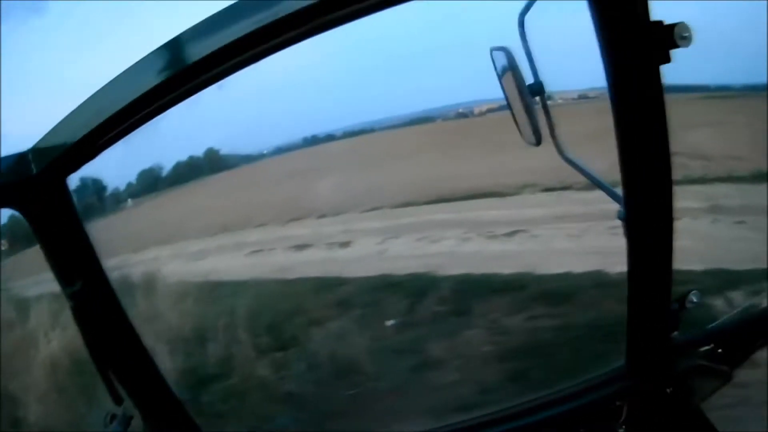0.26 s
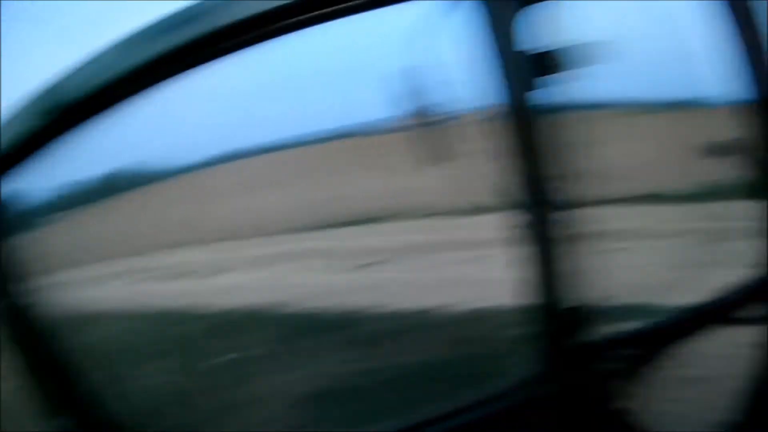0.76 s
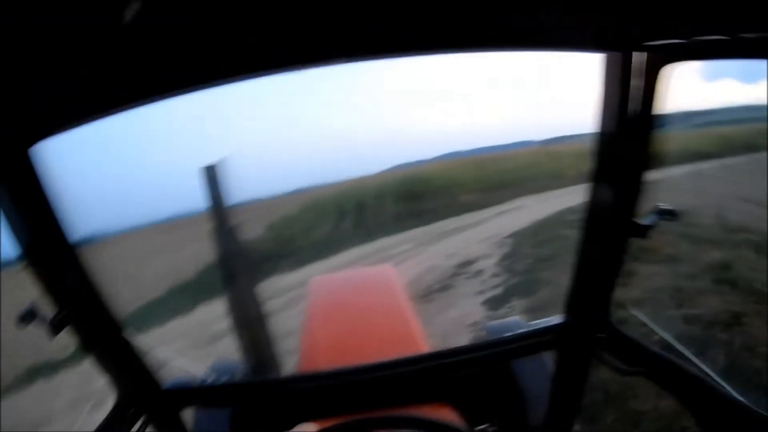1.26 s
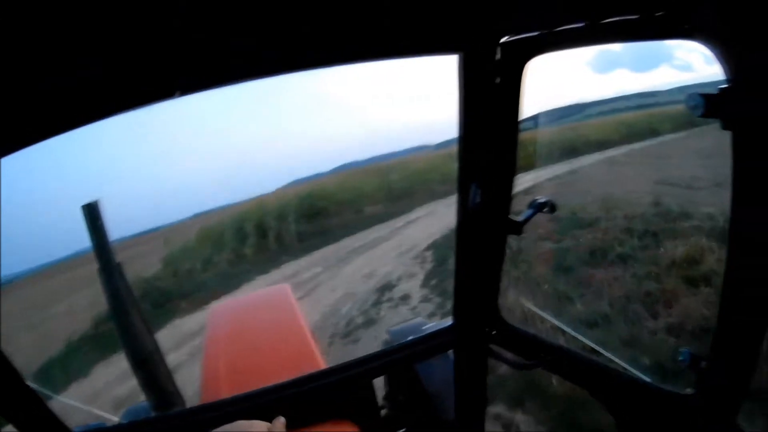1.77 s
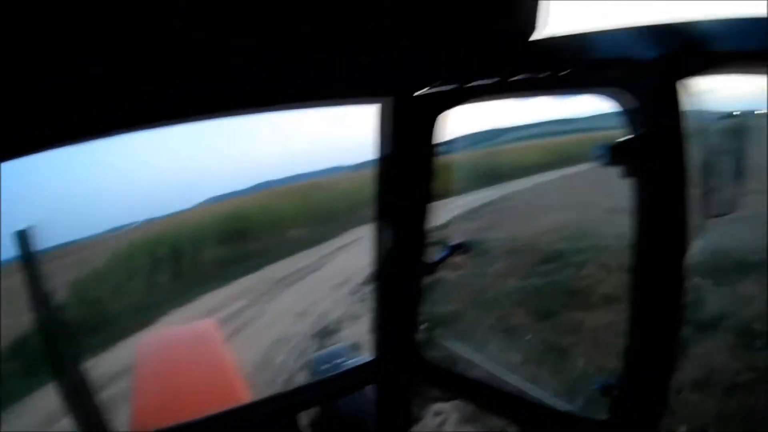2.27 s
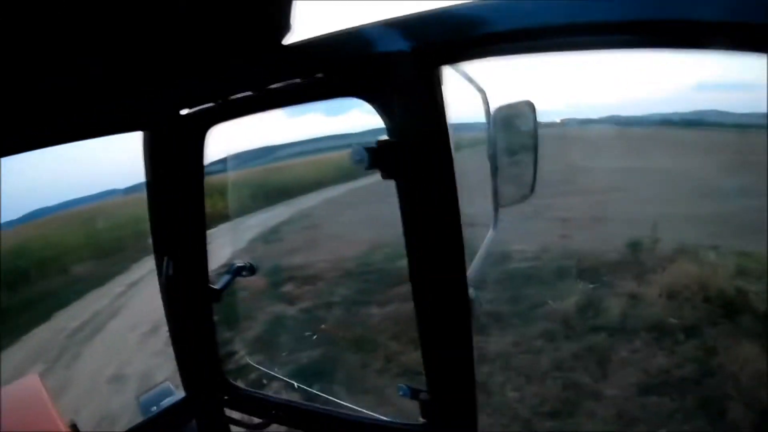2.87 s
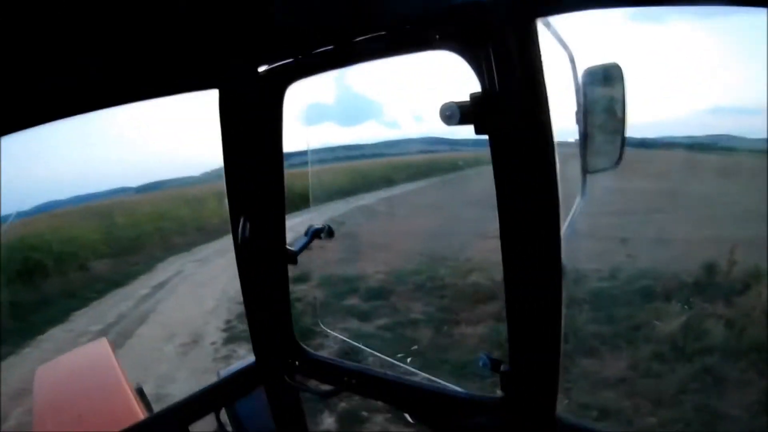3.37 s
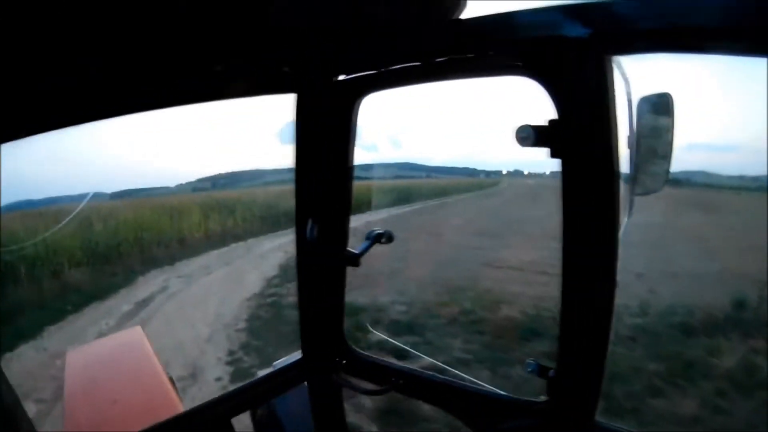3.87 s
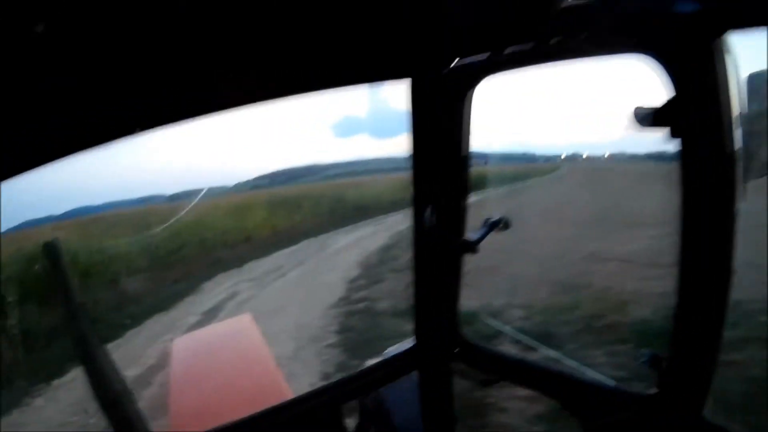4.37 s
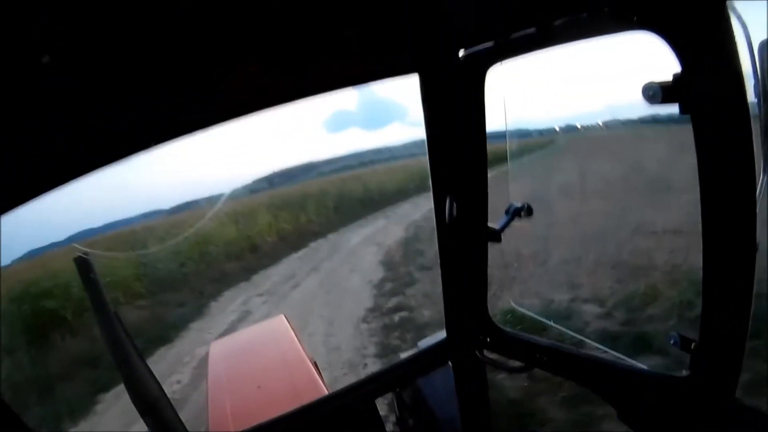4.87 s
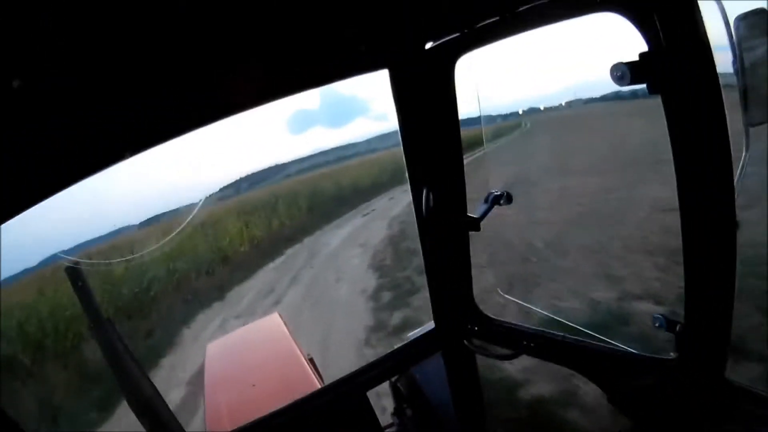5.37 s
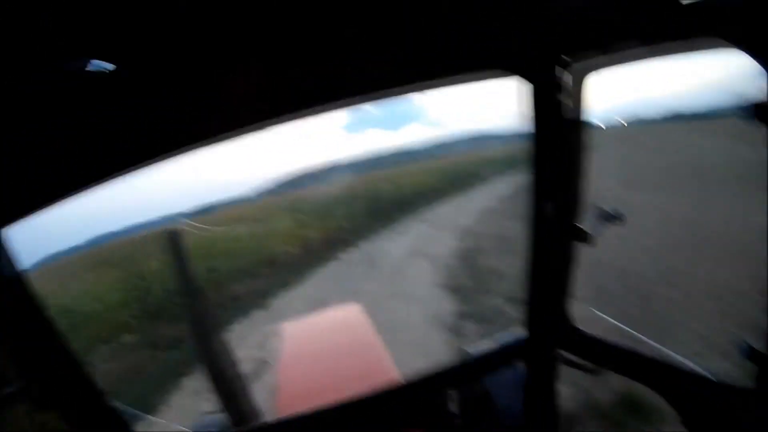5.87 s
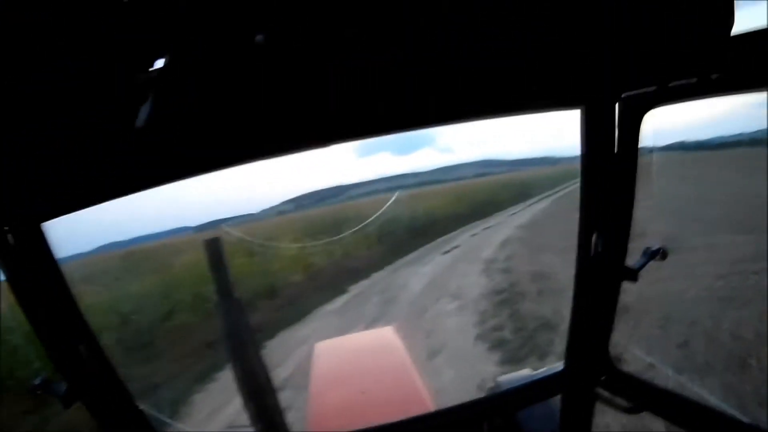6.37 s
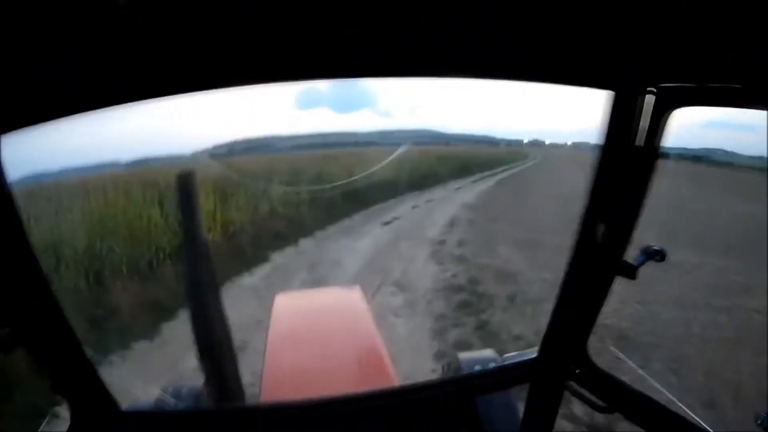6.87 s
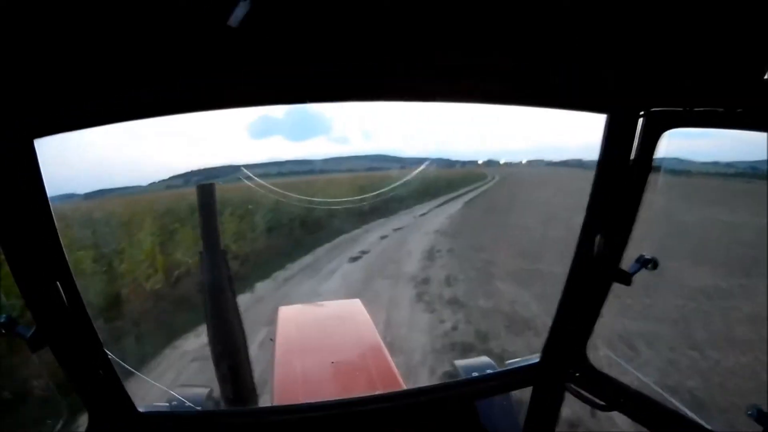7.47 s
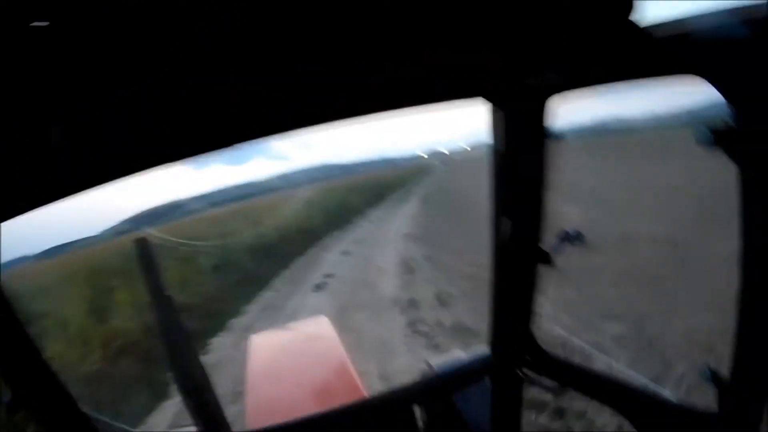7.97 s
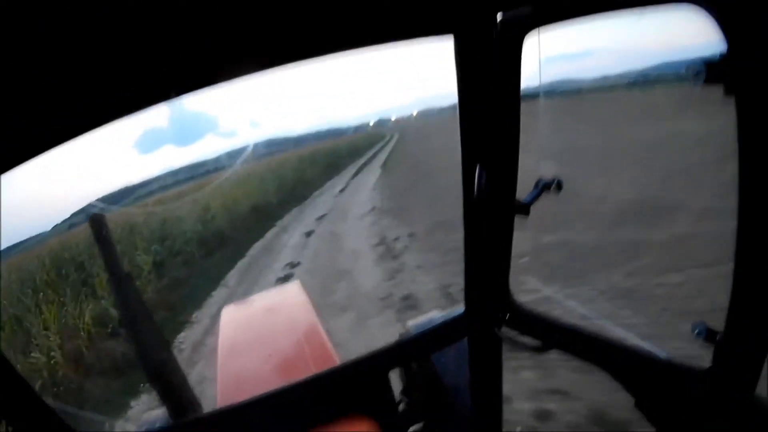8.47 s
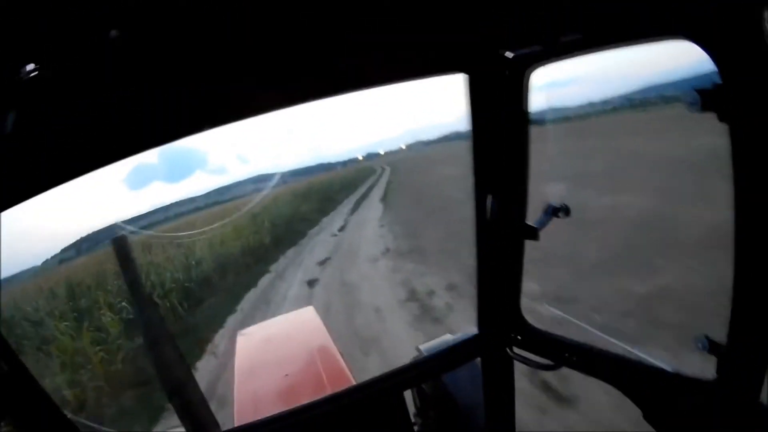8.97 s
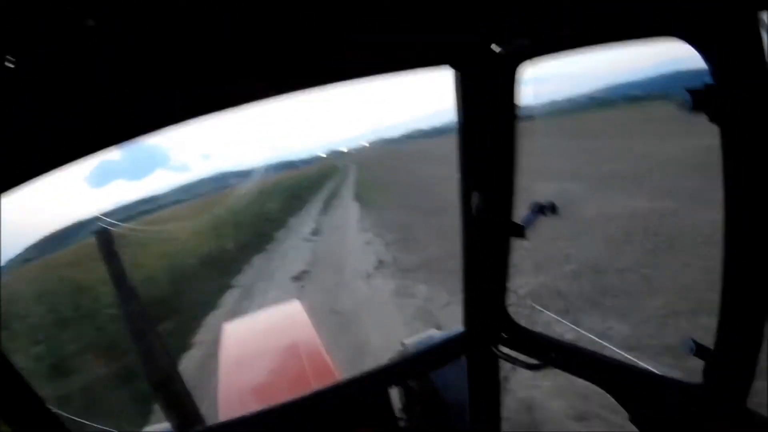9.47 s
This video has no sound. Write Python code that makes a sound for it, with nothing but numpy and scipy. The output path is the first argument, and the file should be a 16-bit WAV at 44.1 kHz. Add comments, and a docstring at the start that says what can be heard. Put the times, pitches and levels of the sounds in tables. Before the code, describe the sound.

A rough diesel tractor engine runs continuously, heard from the driver's place in an enclosed, resonant cab. Hard metallic knocks and bright valve ticking sit over droning exhaust tones and pulsing panel rumble. The note sags slightly, recovers, rises strongly past the middle, eases sharply off load with a few jolts, then labours low and rises to the end. A camera's own mono microphone leaves steady hiss, very high whine and tiny chirps.

```python
"""On a dirt track, inside the cab of a three-cylinder diesel tractor, on a camera's own microphone.
Knocks and valve taps ring the block close by, exhaust overtones glide through the cab's standing waves.
The engine speeds up, the throttle is shut for a second, then it pulls again.
Cab walls boom and rumble, sheet metal buzzes under load, and bumps in the track jolt loose parts.
Behind it all the camera's electronics add steady high tones, hiss and quick faint chirps."""
import sys
import numpy as np
from scipy import signal
from scipy.fft import rfft, irfft, next_fast_len
from scipy.io import wavfile
from scipy.ndimage import uniform_filter1d, minimum_filter1d

SR = 44100
rng = np.random.default_rng(int(sys.argv[2]) if len(sys.argv) > 2 else 0)


def master_out(mix):
    """Clip the mix to full scale and print it as 16-bit PCM to the path in sys.argv[1]."""
    frames = np.transpose(np.atleast_2d(mix))
    ceiling = np.clip(frames, -1, 1)
    pcm = np.round(ceiling * 32767).astype(np.int16)
    wavfile.write(sys.argv[1], SR, pcm)


N = 429529
T = np.arange(N) / SR
CYLINDERS = 3


def amp(db):
    """Decibels to gain."""
    return 10 ** (np.asarray(db) / 20)


def evened(x):
    """Scales to rms 1."""
    return x / np.sqrt(np.mean(x ** 2) + 1e-20)


def curves(rows):
    """Each column of a table, joined by straight lines in time."""
    s, *columns = np.transpose(rows)
    return [np.interp(T, s, column) for column in columns]


def humps(x, rows):
    """Lift in dB near each (centre, width, dB), shaped like a resonance."""
    return sum(db / (1 + (2 * (x - centre) / width) ** 2) for centre, width, db in rows)


def waver(hz):
    """Random drift of rms 1 with nothing faster than the given rate."""
    size = next_fast_len(N, True)
    spectrum = rfft(rng.standard_normal(size))
    slow = np.fft.rfftfreq(size, 1 / SR) < hz
    return evened(irfft(spectrum * slow, size)[:N])


def colour(x, points, rings=(), size=8192):
    """Causal minimum-phase filter with the given spectrum and resonances; the result has rms 1."""
    hz = np.fft.rfftfreq(size, 1 / SR)
    f, db = np.transpose(points)
    db = np.interp(np.log(hz + 1), np.log(f), db) + humps(hz, rings)
    log_gain = np.log(amp(np.r_[db, db[-2:0:-1]]))
    response = np.fft.ifft(np.exp(np.conj(signal.hilbert(log_gain)))).real[:size // 2]
    return evened(signal.oaconvolve(x, response)[:N])


def blows(cycle, place, spread_db, jitter_s):
    """One click each time the engine cycle passes a place, uneven in strength and timing."""
    at = np.flatnonzero(np.diff(np.floor(cycle - place)) > 0)
    size, slip = rng.standard_normal((128, 2))[:len(at)].T
    at = at + np.round(slip * jitter_s * SR).astype(int)
    clicks = np.zeros(N)
    clicks[np.clip(at, 0, N - 1)] = amp(spread_db * size)
    return clicks


def dying(clicks, decay_s):
    """Each click becomes an exponential decay."""
    return signal.lfilter([1], [1, -np.exp(-1 / (decay_s * SR))], clicks)


def chatter(cycle, alike, size=4096):
    """Tiny metal contacts: a share of the power recurs at the same crank angle, the rest is new."""
    alike = np.clip(alike, 0, 1)
    recurring = rng.standard_normal(size)[(cycle % 1 * size).astype(int)]
    return np.sqrt(alike) * recurring + np.sqrt(1 - alike) * rng.standard_normal(N)


def order(cycle, multiple):
    """One sinusoidal partial of the engine's pressure wave, locked to the crankshaft."""
    return -np.cos(2 * np.pi * multiple * cycle - np.pi / 4)


# engine speed: time_s, firings_per_s
ENGINE_SPEED = [(0.0, 29.59), (0.37, 28.593), (1.36, 27.229), (2.3, 30.559), (2.9, 29.892), (3.2, 30.211),
                (4.14, 29.626), (4.36, 31.272), (4.65, 31.435), (4.94, 33.663), (5.35, 35.405),
                (6.17, 41.961), (6.46, 42.564), (7.48, 30.733), (7.55, 31.231), (7.88, 27.283),
                (8.33, 29.384), (9.74, 34.923)]
# load as the engine pulls, eases and coasts: time_s, load_db (relative to full load)
ENGINE_LOAD = [(0, -5), (1.23, -3.5), (1.7, -1), (2.27, -1), (2.36, -4), (3.55, -6.5), (4.15, -5.5),
               (4.3, -2.5), (5.9, -1), (6.4, -3), (6.5, -17.5), (7.33, -14.5), (7.41, -1), (7.58, -1.5),
               (7.9, -1.9), (8.4, -1), (9.74, -2)]
CRUISE_HZ = 30  # firings per second at which the loudness laws start


def level(law):
    """Level in dB from engine speed and load; every law lists level_db, db_per_octave, db_per_load_db."""
    db, db_per_octave, db_per_load = law
    octaves = np.log2(curves(ENGINE_SPEED)[0] / CRUISE_HZ)
    return db + db_per_octave * octaves + db_per_load * curves(ENGINE_LOAD)[0]


SWING_S, SWING_LENGTH_S = 0.82, 1  # middle and length of the camera's turn


def sideways():
    """1 while the camera faces the side window, nearer the clatter; 0 once it faces the front."""
    return np.clip(.5 - (T - SWING_S) / SWING_LENGTH_S, 0, 1)


# cylinder blows, each hard within a range of speed; the second cylinder strikes twice:
# cycle_place (0-1), ring_hz, relative_db, range_middle (firings per s), range_width (firings per s)
KNOCKS = [(.011, 1410, -10.5, 30, 9.6), (.312, 1420, -4.5, 28.6, 2.4), (.378, 1460, -1.5, 28.8, 2.6),
          (.652, 1587, 2, 32.1, 5.5)]
# the soft blow present at all speeds, which grows as the engine races
SOFT_KNOCK_LAW = (-15, 22, 0)
HALF_FORCE_LOAD_DB = -17  # load at which the knocks have half their force


def knocks(cycle, firing_hz):
    """Combustion strikes the block, less at low load; each blow swells and rings for milliseconds."""
    t, out = T[:1024], 0
    swell = t / .0019 * np.exp(1 - t / .0019)
    fuel = np.clip(1.5 - (curves(ENGINE_LOAD)[0] / HALF_FORCE_LOAD_DB) ** 2, 0, 1)
    soft = amp(level(SOFT_KNOCK_LAW))
    for place, hz, db, middle_hz, width in KNOCKS:
        in_range = 1 / (1 + (2 * (firing_hz - middle_hz) / width) ** 4)
        force = fuel * (soft + amp(db) * in_range)
        strikes = 2 * force * blows(cycle, place, spread_db=1, jitter_s=.00008)
        ring = swell * np.sin(2 * np.pi * hz * t)
        out = out + signal.oaconvolve(strikes, ring)[:N]
    return out


# spectrum of the engine block: pitch_hz, relative_db
BLOCK = [(200, -31), (500, -18), (800, -10.5), (1040, -2.5), (1180, -3), (1330, -1), (1500, 2),
         (1680, -2.5), (1850, -5.5), (2020, -6.5), (2300, -19.5), (2750, -25.5), (3700, -49), (6000, -56.5)]
# rings of the block and the tin around it, also heard in the valves: pitch_hz, width_hz, lift_db
RINGS = [(1320, 41, 6.5), (1483, 36, 6), (1690, 96, 3.5), (2473, 26, 6), (3150, 96, 6), (3286, 26, 5),
         (3440, 56, 8.5)]


def block(cycle, slaps, taps):
    """Blows and taps ring the cast block over a bed of gear chatter."""
    power = dying(.5 * slaps + taps ** 2, decay_s=.0035) + .38
    return colour(np.sqrt(power) * chatter(cycle, alike=.7), BLOCK, RINGS)


# spectrum of the valve gear: pitch_hz, relative_db
VALVES = [(1500, -10.5), (2500, 2), (2950, -2.5), (3330, 1.5), (3500, -1.5), (3700, -4.5), (3850, -6.5),
          (3980, 5), (4400, 2.5), (4800, -5), (5300, -13), (6800, -16), (8000, -33), (14000, -55)]


def valves(cycle, slaps, taps):
    """The same blows shake the light valve gear into a brighter, less regular chatter."""
    power = dying(slaps + taps, decay_s=.004) + .7
    return colour(np.sqrt(power) * chatter(cycle, alike=.3), VALVES, RINGS)


# lighter blows of injectors and valves: cycle_place (0-1), relative_db
TAPS = [(0.11, -8), (0.31, 2), (0.423, -6.5), (.468, -7), (0.634, 0), (0.751, -4), (.975, -3)]
# loudness of the block with its knocks, then of the valves
CLATTER_LAW = (-21, 11.4, 0.62)
VALVE_LAW = (-46, 12.8, 0.41)
# spells in which the treble of the clatter swells: middle_s, length_s, lift_db
BRIGHT_SPELLS = [(1.9, .7, 2), (3.5, 0.33, 2.5), (8.05, 0.99, 4.5)]
SIDE_CLATTER_DB = 2.6  # extra clatter toward the side window; the valves get half of these dB


def clatter(cycle, firing_hz):
    """Each engine cycle triggers blows and taps that excite the block and the valve gear."""
    slaps = sum(blows(cycle, place, spread_db=.8, jitter_s=.0004) for place, *_ in KNOCKS)
    taps = sum(amp(db) * blows(cycle, place, spread_db=1, jitter_s=.0004) for place, db in TAPS)
    side_db = SIDE_CLATTER_DB * sideways()
    block_gain = amp(level(CLATTER_LAW) + side_db)
    valve_gain = amp(level(VALVE_LAW) + humps(T, BRIGHT_SPELLS) + .5 * side_db)
    low = knocks(cycle, firing_hz) + block(cycle, slaps, taps)
    return block_gain * low + valve_gain * valves(cycle, slaps, taps)


# overtones; unequal cylinders fill in between the firing orders: cycle_multiple, level_db (at full load)
EXHAUST = [(7, -38), (8, -39), (10, -44.5), (11, -48.5), (12, -36), (13, -46.5), (16, -47), (18, -43),
           (20, -47.5), (21, -44), (24, -46), (27, -50), (30, -45.5), (40, -48.5), (48, -50.5)]
EXHAUST_LAW = (0, 0, 0.6)
# standing waves across the cab: pitch_hz, width_hz, lift_db
CAB_AIR = [(110.6, 10, 6.3), (134, 11, 8), (165.2, 24, 9.2), (209.5, 15.2, 11.9), (276.4, 27, 6.9)]
# standing waves heard when facing the side window: pitch_hz, width_hz, extra_db
SIDE_AIR = [(289, 30, 6.5), (198, 57, -7), (116, 12, 3)]
THIRD_ORDER_DB = -24.5  # at three times the firing rate, full load
EXHAUST_WAVER_DB = 1.44  # rms


def exhaust(cycle, cycle_hz):
    """Exhaust pressure as overtones of the cycle, which swell as they glide through cab standing waves."""
    out = amp(THIRD_ORDER_DB) * order(CYLINDERS * cycle, 3)
    side = sideways()
    for multiple, db in EXHAUST:
        multiple = round(multiple)
        hz = multiple * cycle_hz
        lift = humps(hz, CAB_AIR) + side * humps(hz, SIDE_AIR)
        path = rng.random()  # reflections delay each overtone differently
        gain = amp(db + lift + EXHAUST_WAVER_DB * waver(hz=7.7))
        out = out + gain * order(cycle + path, multiple)
    return np.sqrt(2) * amp(level(EXHAUST_LAW)) * out


# loudness of the air boom, the rocking and the wall drone, before their resonances
BOOM_LAW = (-20, 0, 1.0)
SHAKE_LAW = (-45.5, 0, .15)
DRONE_LAW = (-38.5, 6.3, 0.31)
# air of the whole cab, driven at twice the firing rate: pitch_hz, width_hz, lift_db
CAB_BOOM = [(62.8, 35, 9)]
# the cab rocking on its mounts at the firing rate: pitch_hz, width_hz, lift_db
CAB_MOUNTS = [(41.6, 15.6, 27.3)]
# the cab's walls, driven at five times the firing rate: pitch_hz, width_hz, lift_db
CAB_DRONE = [(163, 18, 9), (199.7, 27, 15.5)]


def cab_hum(firings, firing_hz):
    """Cab air, mounts and walls hum at multiples of the firing rate, loudest at their resonances."""
    boom_db = level(BOOM_LAW) + humps(2 * firing_hz, CAB_BOOM) + .2 * waver(hz=10)
    shake_db = level(SHAKE_LAW) + humps(firing_hz, CAB_MOUNTS) + waver(hz=8)
    drone_db = level(DRONE_LAW) + humps(5 * firing_hz, CAB_DRONE) + waver(hz=10)
    boom = amp(boom_db) * order(firings, 2)
    shake = amp(shake_db) * order(firings + .1, 1)
    drone = amp(drone_db) * order(firings - .06, 5)
    return np.sqrt(2) * (boom + shake + drone)


# spectrum of the cab's rumble: pitch_hz, relative_db
RUMBLE = [(12, -12), (30, -2), (60, 8.5), (130, 3), (205, 2), (270, 3.5), (330, -0.5), (470, 1), (620, -2),
          (800, -5), (1100, -0.5), (2500, -75)]
RUMBLE_LAW = (-27.5, 6.2, 0.51)
# firing rate at which the panels rumble most: firings_per_s, width (firings per s), lift_db
CAB_JUDDER = [(39.9, 4.8, 3)]
# slow drift in the rumble's level: time_s, change_db
RUMBLE_DRIFT = [(0, 0), (2.1, 1), (2.7, -3), (4.2, -1), (5.5, -1.5), (7, 1.5), (8, 1.5), (9.74, 2.5)]


def cab_rumble(cycle, firings, firing_hz):
    """Cab panels rumble as filtered noise that pulses at nearly the firing rate."""
    strokes = 1 + 0.37 * order(firings, 0.94)
    rumble = colour(strokes * chatter(cycle, alike=.35), RUMBLE)
    rumble_db = level(RUMBLE_LAW) + humps(firing_hz, CAB_JUDDER) + curves(RUMBLE_DRIFT)[0]
    return amp(rumble_db) * rumble


# spectra of loose sheet metal, a large panel and a small tin cover: pitch_hz, relative_db
PANEL = [(250, -45.5), (410, -16), (455, 0.5), (483, 4), (520, 2.5), (600, -27.5), (900, -59.5)]
COVER = [(2000, -47), (2900, -14), (3100, -1), (3200, -9.5), (3337, 12), (3400, -13), (3460, -1),
         (3600, -29), (5000, -45)]
PANEL_LAW = (-38, -7, 1.27)
COVER_LAW = (-47.5, 4, 2.7)
COVER_FLUTTER_DB = 3.5  # rms; the tin cover buzzes in fits


def sheet_metal(cycle):
    """A large panel and a small tin cover buzz in step with the firings, most under load."""
    shaking = 1 + .5 * order(cycle, CYLINDERS)
    panel = colour(shaking * chatter(cycle, alike=0.3), PANEL)
    flutter = amp(COVER_FLUTTER_DB * waver(hz=9))
    cover = colour(shaking * flutter * chatter(cycle, alike=.4), COVER)
    return amp(level(PANEL_LAW)) * panel + amp(level(COVER_LAW)) * cover


# bumps of the track: start_s, level_db (before the decay), pitch_hz, width_hz, decay_s
JOLTS = [(6.574, -23, 215, 90, .025), (6.575, -16.5, 1000, 350, .017), (6.576, -17, 1480, 500, .013),
         (6.835, -23, 1500, 450, .03), (2.15, -39, 3250, 200, .02), (6.949, -39, 3800, 2200, .004),
         (7.455, -36, 3270, 150, .02), (7.62, -39, 3970, 70, .08), (7.655, -37, 3130, 150, .025),
         (8.625, -37, 3700, 2000, .025)]


def jolts():
    """Bumps set loose parts of the cab rattling: bands of noise with a quick attack and a decay."""
    out, hz, t = np.zeros(N), np.fft.rfftfreq(SR, 1 / SR), T[:SR]
    for s, db, centre, width, decay_s in JOLTS:
        band = 1 / (1 + (2 * (hz - centre) / width) ** 4)
        ring = evened(irfft(rfft(rng.standard_normal(SR)) * band, SR))
        envelope = np.exp(-t / decay_s) * (1 - np.exp(-t / 0.00073))
        part = out[round(s * SR):][:SR]
        part += (amp(db) * ring * envelope)[:len(part)]
    return out


# heave of the cab over a rut: peak_db, pitch_hz, half_length_s
LURCH = (-13, 33, .035)
LURCH_AT_S = 6.886  # middle of the heave


def lurch():
    """One rut heaves the whole cab: a low tone under a short bell-shaped envelope."""
    db, heave_hz, half = LURCH
    since = T - LURCH_AT_S
    return amp(db) * np.exp(-(since / half) ** 2) * np.cos(2 * np.pi * heave_hz * since)


# steady tones of the camera's electronics: pitch_hz, level_db
WHINE = [(12331, -82), (12407.6, -72.5), (12484.5, -72.5), (12561, -83)]


def whine():
    """The camera's thin high tones, which drift in pitch together."""
    drift = np.cumsum(3.5 * waver(hz=3)) / SR
    tones = sum(amp(db) * np.sin(2 * np.pi * (hz * T + drift + rng.random())) for hz, db in WHINE)
    return np.sqrt(2) * tones


# chirps of the camera's electronics: pitch_hz, peak_db (typical)
CHIRPS = [(6500, -56), (9850, -56)]
CHIRP_RATE_HZ, CHIRP_SHARE = 20, .16  # average chirps per second, share of time they sound


def chirps():
    """The camera's short gated tones, uneven in timing, strength and pitch."""
    slots = CHIRP_RATE_HZ * T + 0.125 * waver(hz=12)
    slot = np.clip(slots, 0, None).astype(int)
    gate = uniform_filter1d((slots % 1 < CHIRP_SHARE) * 1., size=60)
    out = 0
    for hz, db in CHIRPS:
        size, detune = rng.standard_normal((256, 2))[slot].T
        pitch = hz + 70 * detune + 90 * waver(hz=390)
        out = out + amp(db + 2 * size) * gate * np.sin(2 * np.pi * np.cumsum(pitch) / SR)
    return out


# spectrum of the camera's hiss: pitch_hz, relative_db
HISS = [(1000, 13), (7800, -1), (9300, 1), (11500, -2), (13500, -1), (14400, 3), (15600, 2)]


def hiss():
    """The camera's steady electronic noise."""
    return amp(-50.5) * colour(rng.standard_normal(N), HISS)


def scene():
    """One crankshaft drives every engine sound."""
    firing_hz = curves(ENGINE_SPEED)[0]
    cycle_hz = firing_hz / CYLINDERS
    cycle = np.cumsum(cycle_hz) / SR
    firings = CYLINDERS * cycle
    engine = clatter(cycle, firing_hz) + exhaust(cycle, cycle_hz)
    cab = cab_hum(firings, firing_hz) + cab_rumble(cycle, firings, firing_hz)
    body = cab + sheet_metal(cycle) + jolts() + lurch()
    electronics = whine() + chirps() + hiss()
    return (engine + body + electronics)[None]


EDGE_HZ = 15750  # upper limit of the sound


def record(dry):
    """A smooth limiter holds the highest peaks under full scale; then a low-pass limits the band."""
    room = np.minimum(1, .97 / (abs(dry) + 1e-9))
    gain = uniform_filter1d(minimum_filter1d(room, size=401), size=301)
    low_pass = signal.firwin(1023, EDGE_HZ, window=("kaiser", 9), fs=SR)
    return signal.oaconvolve(dry * gain, low_pass[None], "same")


dry = scene()
out = record(dry)
master_out(out)
```